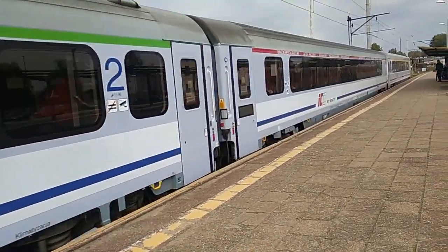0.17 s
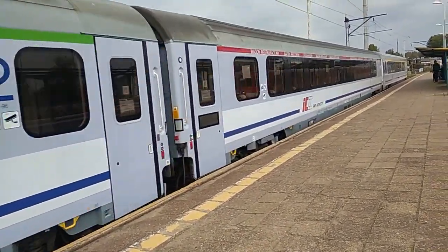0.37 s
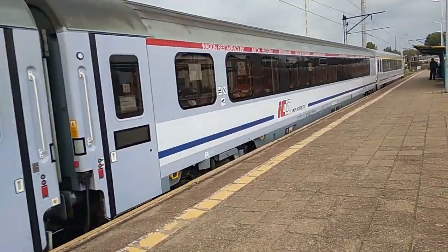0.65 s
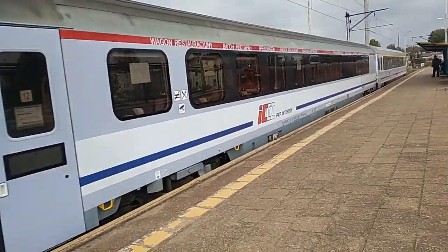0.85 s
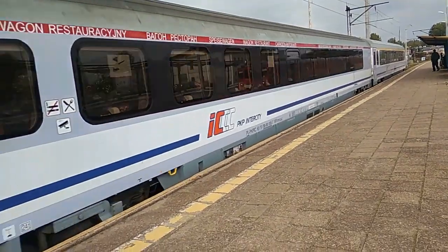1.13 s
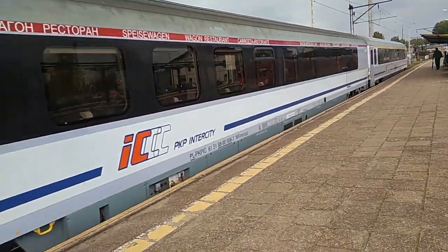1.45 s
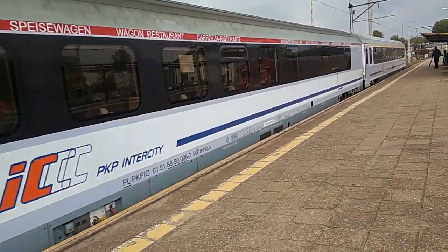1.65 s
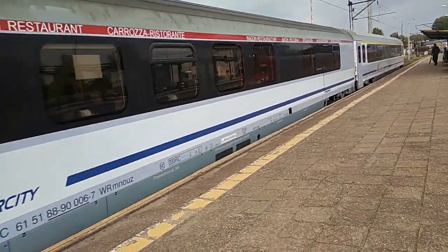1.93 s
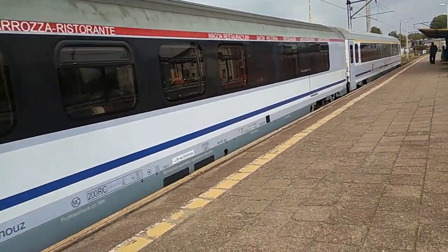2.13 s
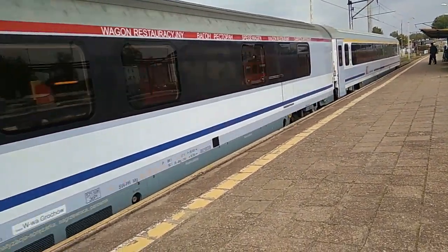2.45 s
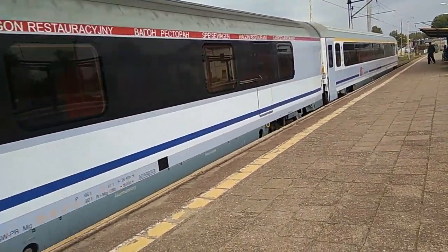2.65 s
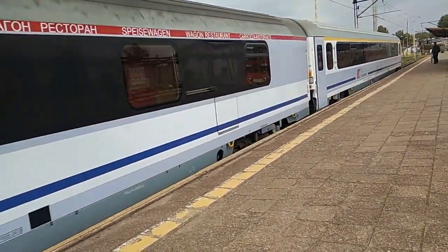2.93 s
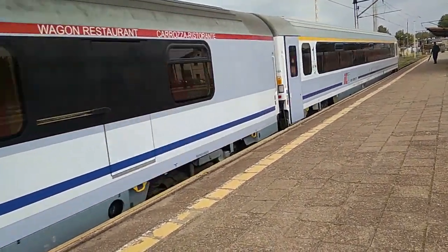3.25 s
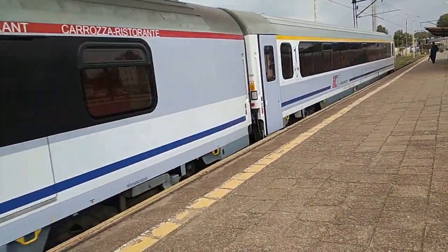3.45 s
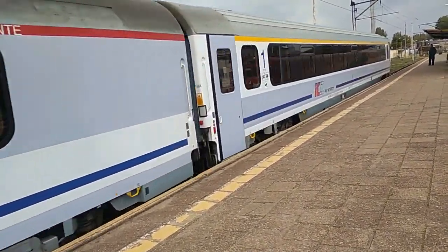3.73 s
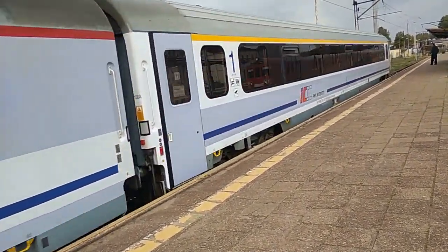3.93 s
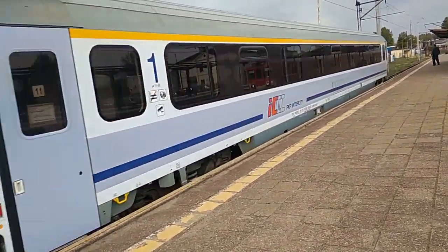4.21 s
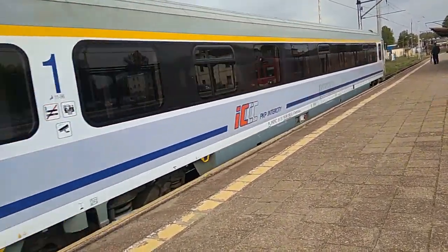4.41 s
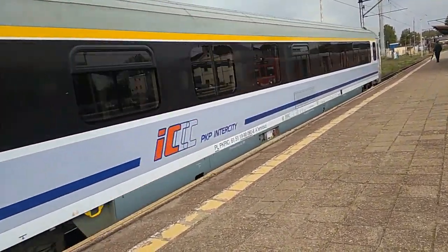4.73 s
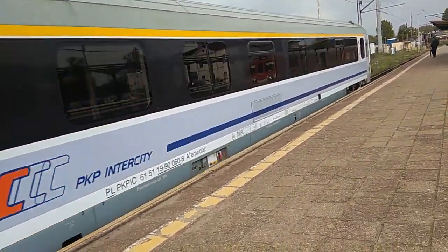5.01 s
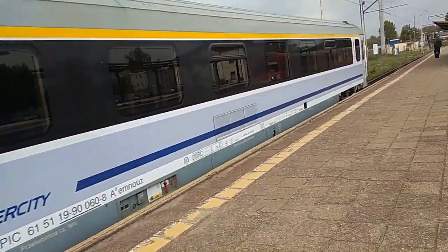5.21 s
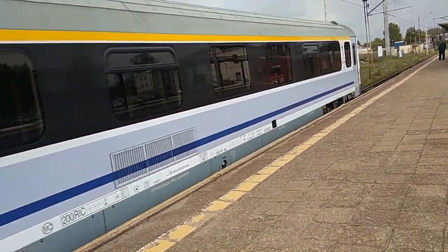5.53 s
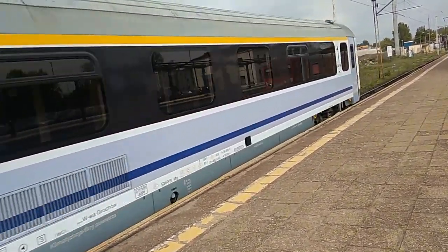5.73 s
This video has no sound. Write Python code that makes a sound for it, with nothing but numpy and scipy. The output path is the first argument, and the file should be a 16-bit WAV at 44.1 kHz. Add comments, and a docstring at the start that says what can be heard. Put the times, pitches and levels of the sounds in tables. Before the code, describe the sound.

Heavy coaches pass at moderate pace beside an open platform, heard close in stereo and weighted left. Low track rumble runs throughout; wheels sing and steel rubs. A double clank comes at once, then scraping hiss and a calmer stretch, then two more double clanks close together, with thin squeals, a deep body boom and small knocks until the end, without the train stopping.

```python
"""Coaches are already rolling past a platform, rumbling and knocking, some three metres from a hand-held microphone.
Rough treads shake track and bogies and sing in the wheels' modes; the draught of the train buffets the two ports.
Flanges hiss along the rail, six axles strike a rail joint in three pairs, and slipping steel squeals thinly.
A deep coach body boom swells in later, and a tiny bright tick comes near the end.
Noise, pushes and short tones drive resonances and broad spectra; the squeals are wavering sines."""
import sys
import numpy as np
from scipy import signal
from scipy.fft import rfft, irfft, next_fast_len
from scipy.io import wavfile
from scipy.ndimage import uniform_filter1d, map_coordinates

SR = 44100
rng = np.random.default_rng(int(sys.argv[2]) if len(sys.argv) > 2 else 0)


def file_out(sig):
    """Save sig as 16-bit WAV at sys.argv[1]."""
    # one column per channel
    cols = np.atleast_2d(sig).T
    # limit, then scale
    lim = np.clip(cols, -1, 1)
    pcm = np.round(lim * 32767).astype(np.int16)
    wavfile.write(sys.argv[1], SR, pcm)


N = 258426
T = np.arange(N) / SR
SIZE = next_fast_len(N + SR // 10, True)  # transform length, with room for tails
HZ = np.maximum(np.arange(SIZE // 2 + 1) * SR / SIZE, 1)

# Bogies passing the microphone, a pair at each coupling.
# Each row: nearest moment in seconds, then rumble, wheel roar and steel rubbing as relative levels in dB.
BOGIES = [(0.25, 2, 2, -7.5), (1.17, 0, -1.5, -18), (3.72, -2.5, 0.5, -6.5), (4.5, -1.5, 0.5, -31)]
# Wheels striking the joint, two axles to a bogie.
# Each row: time in seconds, then track thump, rail ring, wheel ring and grinding edge as relative levels in dB.
JOINTS = [(0.477, -7, -17.5, -21.5, -24), (.805, -7.5, -15.5, -25, -25), (2.946, -6.5, -15.5, -21.5, -24),
          (3.257, -9, -17, -21.5, -25.5), (3.87, -8.5, -17.5, -22, -25), (4.177, -7, -18.5, -21, -25.5)]
# Resonances of track, rail, wheel, rubbing steel and the wheel rim's highest modes.
# Each row: pitch in Hz, width in Hz, relative level in dB.
TRACK_MODES = [(88, 6.9, -4), (158, 23, -5), (233.3, 77, 2.5), (305, 48, -3), (390.6, 17, -7),
               (424, 13, -6)]
RAIL_MODES = [(510, 113, 4), (757, 33, 3.5), (888, 44, 6.5), (998, 34, 4), (1127, 110, -1.5),
              (1420, 520, -8.5)]
WHEEL_MODES = [(1585, 80, -6), (1678, 80, 1), (2326, 130, -1.5), (2650, 30, -3), (2790, 110, -7),
               (3150, 180, -10), (3442, 26, -10)]
RUB_MODES = [(6770, 88, 9.5), (7020, 90, 3.5), (7500, 41, 11), (10180, 80, -4), (11240, 230, -2.5)]
RIM_MODES = [(14760, 230, 12), (15250, 500, -6)]
# Broad spectra of rolling wheels, a struck wheel and a grinding edge. Each row: Hz, relative level in dB per Hz.
ROAR_SPECTRUM = [(300, 0.5), (700, 2.5), (1200, -7), (1600, -1.5), (2000, 2.5), (2500, 5.5), (2900, -0.5),
                 (3400, -6.5), (3900, -23.5), (4600, -17), (6000, -8), (12000, -27), (16000, -60)]
CLANG_SPECTRUM = [(500, -10), (1000, -3), (1500, 6), (2000, -2), (2700, 9.5), (3600, -19.5), (4600, -15),
                  (7000, -17), (14000, -56)]
SIZZLE_SPECTRUM = [(2000, -1.5), (3500, -4), (4700, -15.5), (5700, -4), (7200, 2.5), (8800, -8),
                   (11200, -7.5), (13000, -24), (16000, -32)]

SPEED_M_S, DISTANCE_M = 7.3, 3.08  # the train's pace; from the microphone to the near rail
RUMBLE_FALL_DB = 41.5  # per tenfold distance; also for the wake and the coach body
WHEEL_DRIFT = 0.01  # wander of the wheel resonances, as a share of their pitch
STRUCK_DB = -1  # the wheel modes when struck
BOUNCE_DB = 20  # the landing pushes against the noise of the blow


def undb(db):
    """Decibels to gain."""
    return 10 ** (np.asarray(db) / 20)


def unit(x):
    """Scale to an rms of one."""
    return x / np.sqrt(np.mean(x ** 2))


def ease(x):
    """A smooth step from nought to one."""
    return np.sin(np.pi / 2 * np.clip(x, 0, 1)) ** 2


def across(points):
    """(Hz, value) points joined on a log-frequency axis."""
    hz, value = np.transpose(points)
    return np.interp(np.log(HZ), np.log(hz), value)


def colour(points):
    """Response of a broad spectrum, with unit power."""
    gain = undb(across(points))
    return gain / np.sqrt(np.mean(gain ** 2))


def ringing(modes):
    """Response of a set of damped resonances, with unit power; little is radiated outside their range."""
    gain = sum(undb(db) / (1 + 1j * (HZ - hz ** 2 / HZ) / width) for hz, width, db in modes)
    lowest, highest = modes[0][0], modes[-1][0]
    gain = gain / (1 + (HZ / (1.6 * highest)) ** 4)
    gain = gain / (1 + (lowest / (2 * HZ)) ** 4)
    return gain / np.sqrt(np.mean(abs(gain) ** 2))


def steel(t60, ring_db):
    """The countless close modes of bogie and rail: direct sound and a short metallic ring, different at each port."""
    age = T[:SR // 2]
    tail = rng.standard_normal((2, len(age))) * np.exp(-np.log(1000) * age / t60)
    gain = 1 + undb(ring_db) * rfft(tail / np.sqrt(np.sum(tail[0] ** 2)), SIZE)
    return gain / np.sqrt(np.mean(abs(gain) ** 2))


def through(x, response):
    """Filter by a frequency response."""
    return irfft(rfft(x, SIZE) * response, SIZE)[..., :N]


def walk(rate):
    """Random levels held for 1 / rate seconds and smoothed twice; rms of one."""
    k = int(SR / rate)
    steps = np.repeat(rng.standard_normal(N // k + 1), k)
    slewed = uniform_filter1d(uniform_filter1d(steps, k), k)
    return unit(slewed[:N])


def force(grain_db=0, grain_rate=300):
    """Random contact force, bunched into grains; the ports hear its bass much alike and its treble almost unrelated."""
    # Likeness of the two ports. Each row: Hz, likeness from 0 to 1.
    likeness = [(50, .8), (130, .85), (300, .88), (640, .65), (1300, .35), (3000, .2), (15000, .05)]
    mid, side = rng.standard_normal((2, N))
    alike = np.clip(across(likeness), 0, 1)
    shared = through(mid, np.sqrt(1 + alike))
    apart = through(side, np.sqrt(1 - alike))
    pair = shared + np.array([[1], [-1]]) * apart
    return unit(pair * undb(grain_db * walk(grain_rate)))


def drift(x, share, rate):
    """Let all the resonances in a sound wander up and down in pitch together."""
    sway = walk(rate)
    place = np.arange(N) + share * sway / np.std(np.diff(sway))
    return np.array([map_coordinates(port, [place], order=3, mode="mirror") for port in x])


def passing(times, dbs, fall_db):
    """Summed level of sources that are nearest at the given times and fade with distance."""
    along_m = SPEED_M_S * (T - np.reshape(times, (-1, 1)))
    distance_ratio = np.hypot(along_m, DISTANCE_M) / DISTANCE_M
    db = np.reshape(dbs, (-1, 1)) - fall_db * np.log10(distance_ratio)
    return np.sqrt(np.sum(undb(db) ** 2, axis=0))


def running_level(bogie_db, worn_db, far_db, fall_db, lag_s=0):
    """A rolling layer swells as each bogie goes by and as each axle crosses the worn rail at the joint."""
    bogies = passing(np.array(BOGIES)[:, 0] + lag_s, bogie_db, fall_db)
    worn = passing(np.array(JOINTS)[:, 0] + lag_s, worn_db, fall_db)
    return np.sqrt(bogies ** 2 + worn ** 2 + undb(far_db) ** 2)


def pings(count=700):
    """Specks and dents on the treads ring ever different steel modes: a shimmer of short-lived lines."""
    low_hz, high_hz, t60_s = 1410, 3554, 0.17
    spread_db = 2  # from ping to ping
    out = np.zeros((2, N + SR // 4))
    age = T[:SR // 4]
    ring = ease(age / 0.0043) * np.exp(-np.log(1000) * age / t60_s)
    for (when, pitch, left, right), size in zip(rng.random((count, 4)), rng.standard_normal(count)):
        hz = low_hz * (high_hz / low_hz) ** pitch
        shape = undb(spread_db * np.clip(size, -2, 1.5)) * ring
        start = int(when * N)
        turns = hz * age + np.array([[left], [right]])  # each port has its own phase
        out[:, start:start + len(age)] += shape * np.sin(2 * np.pi * turns)
    return unit(through(out, colour(ROAR_SPECTRUM)))


def rolling():
    """Tread roughness shakes the track low down and rings rail and wheels higher up; steel rubs lightly all along."""
    # Spectra of track rumble and rubbing steel. Each row: Hz, relative level in dB per Hz.
    rumble_spectrum = [(25, -20.5), (60, -1), (110, -4.5), (150, 0.5), (200, 2), (250, -1), (310, -5),
                       (400, -9.5), (500, -13.5), (580, -19), (690, -27), (1000, -32), (1500, -51),
                       (3000, -85)]
    rub_spectrum = [(2500, 6.5), (4500, -3.5), (6000, 3.5), (7000, 7.5), (8000, 3), (9000, -0.5),
                    (11500, -17), (13000, -46), (15000, -23), (16000, -35)]
    _, rumble_db, roar_db, rub_db = np.transpose(BOGIES)
    rumble = through(force(grain_db=1.0, grain_rate=66), colour(rumble_spectrum)) * undb(0.66 * walk(9))
    rail = through(force(grain_db=0.5, grain_rate=64), undb(-7.0) * ringing(RAIL_MODES))
    # the wheel modes flutter and wander a little as the treads turn
    tread = force(grain_db=1.5, grain_rate=40)
    wheels = drift(through(tread, undb(-3.5) * ringing(WHEEL_MODES)), WHEEL_DRIFT, 8)
    roar = through(force(grain_db=0.5, grain_rate=130), undb(-3.5) * colour(ROAR_SPECTRUM))
    rub = through(force(grain_db=4.5, grain_rate=52), undb(1.0) * colour(rub_spectrum))
    rub = rub + through(force(), undb(-3.5) * ringing(RUB_MODES))
    # each layer: beside a bogie, one axle on worn rail, the rest of the train, fall per tenfold distance (dB)
    rumble_level = running_level(-22 + rumble_db, -25.5, -25.5, RUMBLE_FALL_DB)
    # the wheels sing loudest just after they have gone by
    roar_level = running_level(-40 + roar_db, -66, -50.5, 19.5, lag_s=0.27)
    rub_level = running_level(-39.5 + rub_db, -48, -57.5, 51)
    rattle = undb(1.3 * walk(28))  # unevenness of the rolling metal
    metal = (rail + wheels + roar + undb(-10) * pings()) * roar_level * rattle
    metal = metal + rub * rub_level
    return rumble * rumble_level + through(metal, steel(t60=0.047, ring_db=-8.5))


def draught():
    """Air dragged along by the coaches gustily buffets each port separately; single eddies stand out."""
    # Spectrum of the buffeting. Each row: Hz, relative level in dB per Hz.
    buffet_spectrum = [(15, -29), (28, -10), (42, -8.5), (70, -2), (110, 1), (170, -14), (300, -17.5),
                       (800, -67.5)]
    # Single eddies. Each row: peak in seconds, rise and equal fall in seconds, level in dB, left minus right in dB.
    eddies = [(0.135, 0.13, -19.5, -3), (0.958, 0.047, -26, -18), (1.255, 0.26, -32, -16),
              (1.424, 0.077, -16.5, 0), (1.637, 0.12, -23.5, -22), (1.88, 0.11, -21, -9),
              (2.076, 0.095, -25.5, -14), (3.0, 0.56, -31, 14), (4.018, 0.3, -25, 10), (5.13, 0.23, -27, 0)]
    steady_db, wake_db, gustiness_db = -30.5, -49, 1.5  # the bogies' wake hardly adds to the steady draught
    wake = np.hypot(passing(np.array(BOGIES)[:, 0], wake_db, RUMBLE_FALL_DB), undb(steady_db))
    gusts_db = gustiness_db * np.array([walk(5.9), walk(9.0)])
    port_db = np.array([[0], [-2.5]])
    power = (wake * undb(gusts_db + port_db)) ** 2
    for s, length, db, pan_db in eddies:
        swell = ease(1 - abs(T - s) / length)
        power = power + (swell * undb(db + np.array([[pan_db], [-pan_db]]) / 2)) ** 2
    return through(rng.standard_normal((2, N)), colour(buffet_spectrum)) * np.sqrt(power)


def blows(times, dbs, delay, rise, hold, t60):
    """Envelope of blows that swell, hold briefly and die away (all in seconds)."""
    power = np.zeros(N)
    for s, db in zip(times, dbs):
        start = min(int((s + delay) * SR), N)
        age = T[:min(N - start, SR // 2)]
        decay = np.exp(-np.log(1000) * np.maximum(age - rise - hold, 0) / t60)
        shape = np.minimum(age / rise, 1) * decay
        power[start:start + len(age)] += (undb(db) * shape) ** 2
    return np.sqrt(power)


def pushes(times, dbs):
    """Each blow begins with one firm push, the same at both ports."""
    push = np.zeros(N)
    push[(times * SR).astype(int)] = undb(dbs)
    return push


def knocks():
    """Short, light blows bump the track and briefly ring rail and wheel."""
    # Lighter knocks of running gear and far joints.
    # Each row: time in seconds, then track thump, rail ring and wheel ring as relative levels in dB.
    light_blows = [(.025, -20, -31, -37), (0.059, -18.5, -35, -36), (.141, -24, -39, -48),
                   (0.212, -34, -37, -38), (.273, -28, -34, -41), (0.33, -23, -38, -30),
                   (0.385, -17, -38, -42), (.655, -15.5, -37, -26.5), (.952, -20, -46, -41),
                   (1.201, -20.5, -37, -45), (1.351, -22, -33, -36), (1.426, -24, -38, -31.5),
                   (1.573, -17, -39, -36), (1.609, -23, -36, -44), (1.652, -22, -38, -36),
                   (1.885, -20.5, -39, -52), (2.053, -23, -44, -47), (2.13, -23, -39, -38),
                   (2.355, -27.5, -60, -59), (2.66, -25, -57, -43), (2.808, -20.5, -38, -29),
                   (3.132, -21.5, -33.5, -26.5), (3.203, -19, -36, -40), (3.455, -20, -43, -35),
                   (3.526, -18.5, -41, -40), (3.645, -21, -45, -33), (3.748, -21, -38, -27),
                   (4.048, -21.5, -33, -24.5), (4.397, -19, -34, -45), (4.55, -24, -44, -47),
                   (4.706, -19, -44, -45), (4.806, -20, -53, -35), (4.853, -18.5, -50, -48),
                   (5.079, -31, -42, -41), (5.195, -17.5, -26.5, -30), (5.39, -28.5, -39, -38),
                   (5.541, -17.5, -35.5, -33)]
    rise_s, hold_s, t60_s = 0.0043, 0.0023, 0.091
    s, thump_db, rail_db, wheel_db = np.transpose(light_blows)
    bump = blows(s, thump_db, 0, rise_s, hold_s, t60_s)
    rail = blows(s, rail_db, 0.0018, rise_s, hold_s, t60_s)
    # the wheel speaks later and rings longer than the rail
    wheel = blows(s, wheel_db, 0.0053, rise_s, hold_s, 0.2)
    track_force = undb(-3) * bump * force() + undb(20.5) * pushes(s, thump_db)
    thump = through(track_force, ringing(TRACK_MODES))
    clink = through(rail * force(), ringing(RAIL_MODES))
    ring = through(wheel * force(), undb(-9) * ringing(WHEEL_MODES))
    clang = through(wheel * force(), undb(-8.5) * colour(CLANG_SPECTRUM))
    return thump + clink + ring + clang


def leaning(lag_s=0):
    """Pressure of the flange on the rail: each scrape swells, creeps up slightly and lets go."""
    # A flange scraping along the rail. Each row: start in seconds, length in seconds, relative level in dB.
    scrapes = [(.08, 0.24, -43.5), (0.67, 0.31, -30), (1.142, 0.36, -28.5), (1.359, 0.34, -28),
               (1.556, 0.25, -34), (2.608, 0.14, -29), (2.724, 0.15, -45), (5.657, .34, -48.5)]
    attack_s, release_s, creep_db_per_s = 0.14, 0.14, 2
    pressure = np.zeros(N)
    for s, length, db in scrapes:
        swell = ease((T - s - lag_s) / attack_s)
        release = ease((s + length - T) / release_s)
        pressure += undb(db + creep_db_per_s * (T - s)) * swell * release
    return pressure


def flange():
    """A flange leans on the rail: dense tiny slips merge into a bright, uneven hiss."""
    # Spectrum of the scraping. Each row: Hz, relative level in dB per Hz.
    scrape_spectrum = [(1500, -12.5), (3500, -9.5), (5000, -5), (6200, 1), (6900, 4), (7800, -1),
                       (8700, -10.5), (11300, -7.5), (13000, -18), (14000, -29), (16000, -34)]
    slips = force(grain_db=2.8, grain_rate=220) * leaning() * undb(1.4 * walk(30))
    body = undb(-2.04) * colour(scrape_spectrum) * steel(t60=0.17, ring_db=4.5)
    hiss = drift(through(slips, body), 0.025, 18)
    # as the contact point shifts, the rubbing modes flare up and fade on their own
    flare = through(force(grain_db=3, grain_rate=26) * leaning(), undb(-8.5) * ringing(RUB_MODES))
    # the rim's highest modes take time to build up and speak mostly under high pressure
    pressure = leaning(lag_s=0.026)
    rim_force = force(grain_db=-2.5, grain_rate=40) * pressure ** 2 / pressure.max()
    whistle = through(rim_force, undb(-5.5) * ringing(RIM_MODES))
    return hiss + flare + whistle


def bounces(times, dbs, delay, count=6):
    """A wheel lands hard and rebounds a few times, unevenly and ever more lightly on the whole."""
    gap_s, fall_db_per_s, spread_db = 0.011, 232, 3  # mean gap; fading; unevenness between rebounds
    push = np.zeros(N)
    for s, db, (gaps, sizes) in zip(times, dbs, rng.uniform(-1, 1, (len(times), 2, count))):
        waits = gap_s * (1 + 0.5 * gaps)
        age = np.cumsum(waits) - waits[0]
        uneven_db = spread_db * sizes * (age > 0)  # the landing itself keeps its level
        push[((s + delay + age) * SR).astype(int)] = undb(db - fall_db_per_s * age + uneven_db)
    return push


def joints():
    """A wheel drops into the gap, thumps the track, slams on the next rail end, rebounds and grinds over its edge."""
    s, thump_db, rail_db, wheel_db, edge_db = np.transpose(JOINTS)
    # rail, bright edge and wheel ring start a few milliseconds after the drop, the wheel last
    drop = blows(s, thump_db, delay=0.0026, rise=0.0035, hold=0.014, t60=0.2)
    land = blows(s, rail_db, delay=0.004, rise=0.0041, hold=0.0079, t60=0.11)
    slam = blows(s, wheel_db, delay=0.0088, rise=0.0077, hold=0.0037, t60=0.38)
    grind = blows(s, edge_db, delay=0.0048, rise=0.011, hold=0.019, t60=0.3)

    landing = undb(17.0) * pushes(s, thump_db) + undb(15.5) * bounces(s, thump_db, delay=0.00856)
    thump = through(undb(-3.5) * drop * force() + landing, ringing(TRACK_MODES))

    rail_force = land * force(grain_db=3.0, grain_rate=400)
    rail_force = rail_force + undb(BOUNCE_DB) * bounces(s, rail_db, delay=0.008)
    clunk = through(rail_force, undb(-4.0) * ringing(RAIL_MODES))

    # so hard a blow favours the wheel's higher modes
    wheel = undb(-5) * colour(CLANG_SPECTRUM) * steel(t60=0.1, ring_db=10.5)
    wheel = wheel + undb(STRUCK_DB) * ringing(WHEEL_MODES) * (HZ / 2300) ** 0.5
    # the contact crackles as the wheel slams down
    wheel_force = undb(-4.5) * slam * force(grain_db=3.2, grain_rate=800)
    wheel_force = wheel_force + undb(BOUNCE_DB) * bounces(s, wheel_db, delay=0.014)
    clang = drift(through(wheel_force, wheel), WHEEL_DRIFT, 14)

    edge = colour(SIZZLE_SPECTRUM) * steel(t60=0.093, ring_db=9.0)
    edge = edge + undb(-18) * ringing(RUB_MODES) + undb(-16.5) * ringing(RIM_MODES)
    sizzle = through(grind * force(grain_db=2.5, grain_rate=440), edge)
    return thump + clunk + clang + sizzle


def squeals():
    """Stick-slip feeds a single wheel mode: a wavering tone swells, holds and fades; most long ones sink a little."""
    # Squeals of slipping steel. Each row: start in seconds, length in seconds, fade-out in seconds,
    # starting pitch in Hz, glide in Hz per second, pitch waver as a share, level in dB.
    slips = [(1.6, 0.92, 0.36, 7000, -60, 0.018, -58.5), (1.596, 0.75, 0.22, 6820, -56.5, 0.0143, -57),
             (1.553, 1.9, .4, 14040, -220, 0.013, -61.5), (2.4, 1.1, 0.26, 7650, -0.5, 0.0079, -61),
             (2.825, 0.051, .015, 4600, 1, .03, -56), (3.748, 0.076, .025, 4590, 8, 0.018, -49),
             (3.8, 1.02, 0.5, 4030, -59.5, 0.011, -49.5), (4.05, 0.074, .025, 4740, -6, .028, -47),
             (4.377, 0.052, 0.018, 6800, 0.5, 0.059, -44.5), (4.686, .06, .03, 6900, 0, 0.06, -47),
             (5.406, 0.043, .012, 3270, -3, 0.0236, -42), (5.549, 0.065, .02, 2400, -1.5, 0.05, -39),
             (5.68, 0.29, .06, 7630, 3, 0.024, -58)]
    out = np.zeros((2, N))
    for s, length, fade, hz, glide, waver, db in slips:
        span = (T > s) & (T < s + length)
        age = T[span] - s
        swell = ease(age / (0.13 * length)) * ease((length - age) / fade)
        pitch = (hz + glide * age) * (1 + waver * walk(900)[span])
        phase = 2 * np.pi * np.cumsum(pitch) / SR
        level = undb(db + 2.6 * walk(60)[span])
        tone = np.sqrt(2) * np.sin(phase + rng.uniform(0, 2 * np.pi, (2, 1)))
        out[:, span] += level * swell * tone
    return out


def boom():
    """The bogies shake a coach body in its one deep resonance."""
    # Swells of the boom. Each row: peak in seconds, level in dB.
    swells = [(2.95, -27), (4.35, -25)]
    # The coach body's resonance. Each row: pitch in Hz, width in Hz, relative level in dB.
    body_modes = [(147, 9.9, 0)]
    s, db = np.transpose(swells)
    return through(force(), ringing(body_modes)) * passing(s, db, RUMBLE_FALL_DB)


def tick():
    """One tiny bright click: a very short burst of noise."""
    snap = blows([5.696], [-31], delay=0, rise=0.0004, hold=0.00091, t60=0.0084)
    return through(snap * force(), colour(SIZZLE_SPECTRUM))


def scene():
    """The train is mostly louder on the left; its sound bounces once between coach side and platform edge."""
    # Level balance of the two ports. Each row: Hz, left minus right in dB.
    balance = [(60, -2.5), (110, 4), (220, 5.5), (400, 6), (700, 5.5), (1100, 5.5), (1400, 12.5),
               (1700, 14.5), (2000, 11), (2500, 17), (3500, 12), (4600, 1), (7000, 16), (9500, -2.5),
               (12000, -4), (15000, 2)]
    echo_s, echo_gain, port_lag_s = 0.008, 0.25, 0.000348
    train = rolling() + boom() + joints() + knocks() + flange() + squeals() + tick()
    echo = 1 + echo_gain * np.exp(-2j * np.pi * HZ * echo_s) / (1 + (HZ / 2500) ** 2)
    ports = np.array([undb(across(balance)), np.ones(len(HZ))])
    ports = ports / np.sqrt(np.mean(ports ** 2, axis=0))
    # the left port lags; bass spreads from the whole track and reaches both ports nearly together
    lag_s = port_lag_s * HZ ** 2 / (HZ ** 2 + 250 ** 2)
    lag = np.exp(-2j * np.pi * HZ * np.outer([1, 0], lag_s))
    return through(train, echo * ports * lag) + draught()


def record(dry):
    """The recorder rounds the highest peaks and cuts the top."""
    ceiling, top_hz = 1.7, 15750
    rounded = ceiling * np.tanh(dry / ceiling)
    return signal.sosfilt(signal.ellip(10, 0.2, 80, top_hz, fs=SR, output="sos"), rounded)


dry = scene()
out = record(dry)
file_out(out)
```